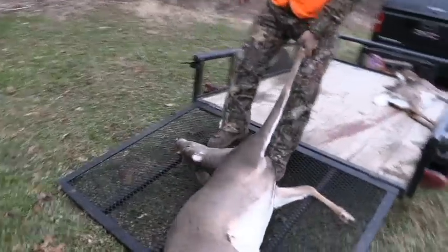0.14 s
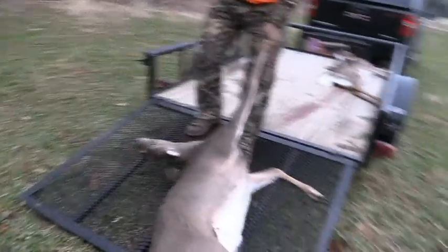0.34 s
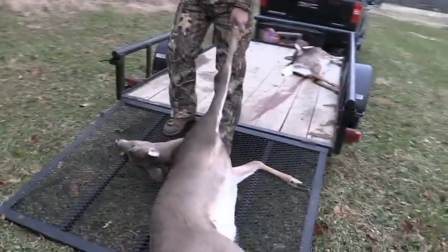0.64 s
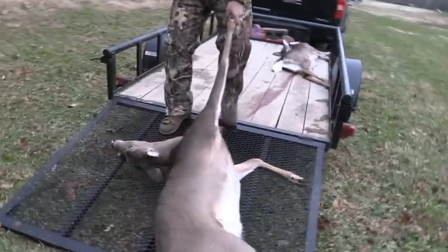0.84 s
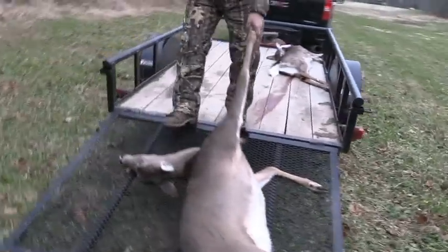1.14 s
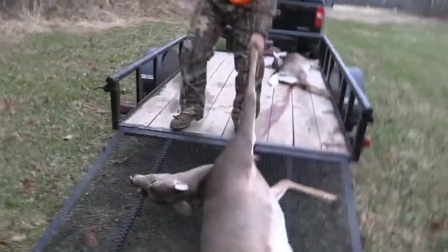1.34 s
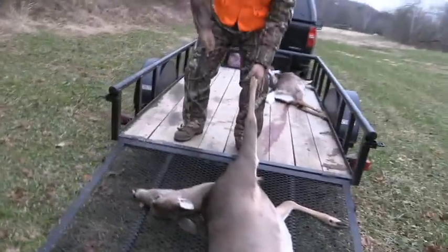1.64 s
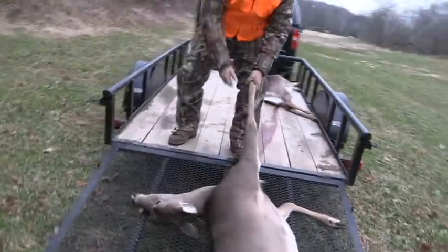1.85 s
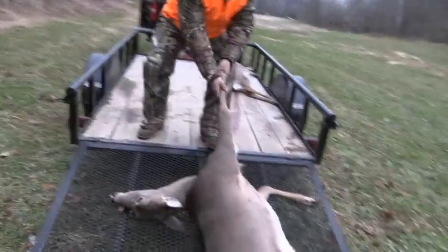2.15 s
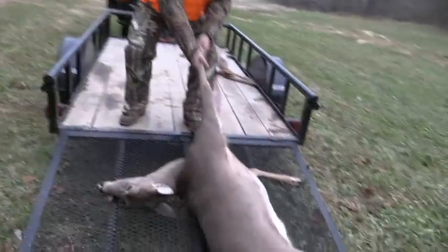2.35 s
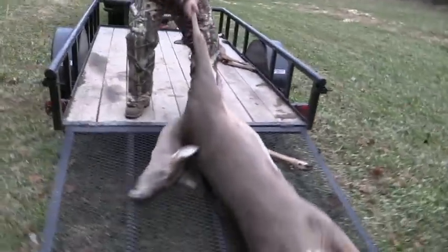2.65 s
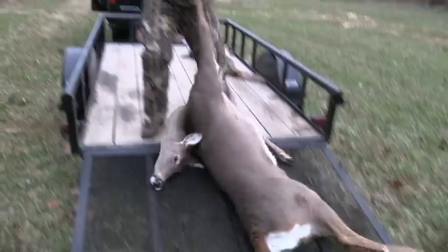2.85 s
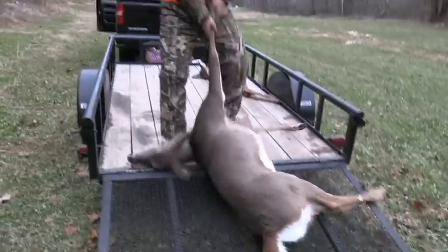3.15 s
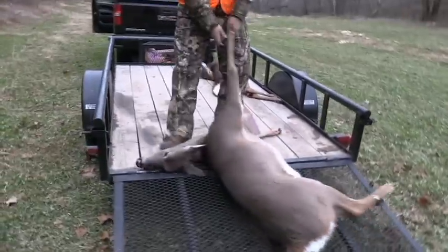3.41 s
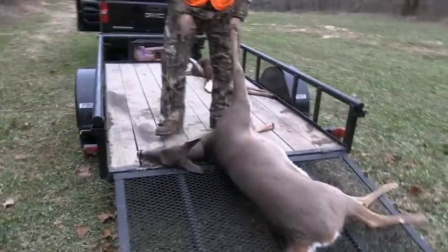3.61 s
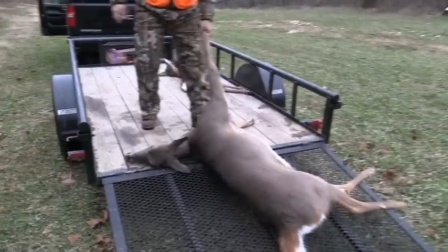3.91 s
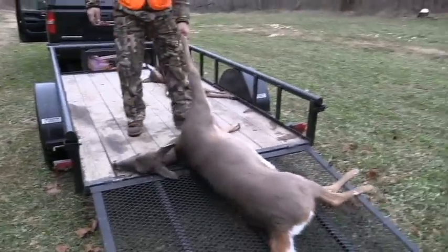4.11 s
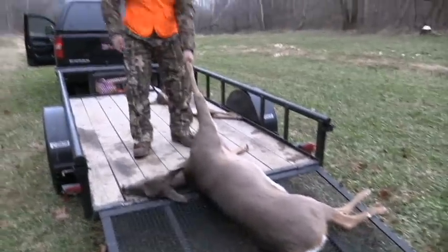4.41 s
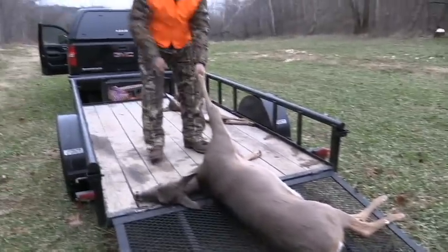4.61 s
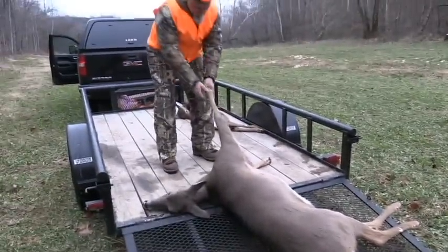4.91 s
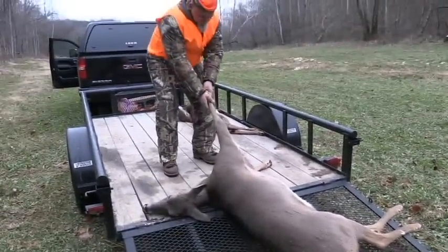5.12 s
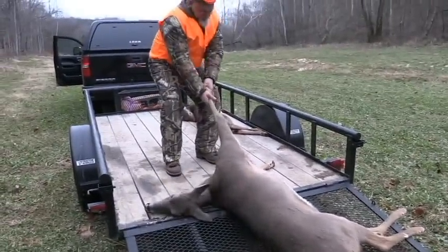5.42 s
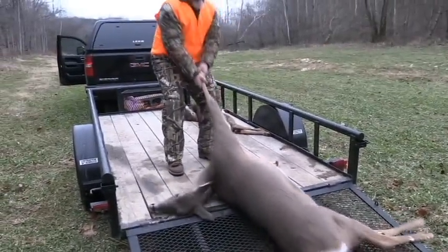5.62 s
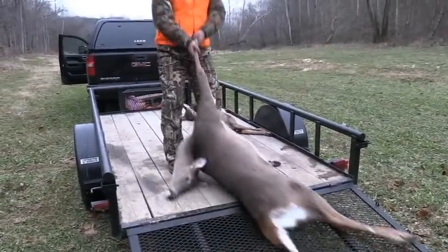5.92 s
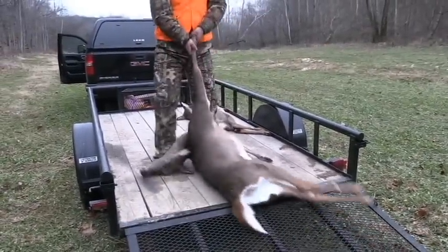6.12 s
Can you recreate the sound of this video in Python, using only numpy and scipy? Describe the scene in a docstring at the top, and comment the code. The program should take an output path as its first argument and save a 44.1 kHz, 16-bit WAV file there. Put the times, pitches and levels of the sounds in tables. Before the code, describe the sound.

Boots knock on trailer planks, clothes rustle, then a limp animal body drags over metal mesh with rumbling scrapes, thumps and a clattering finish.

```python
"""Carcass hauled onto a trailer

A heavy carcass is hauled in two main pulls up a steel mesh ramp onto a plank deck, in a quiet field.
Boots, head and legs knock on the trailer: shaped noise bursts for the planks, decaying sines for the frame.
Random slips, filtered, make the coat hiss, the mesh rattle and the deck rumble as the body gathers speed.
Clothes rustle as filtered grains; wires ping, a sole scuffs and rubber squeaks as resonated noise."""
import sys
import numpy as np
from scipy import signal
from scipy.fft import rfft, irfft
from scipy.io import wavfile
from scipy.ndimage import uniform_filter1d

SR = 44100
rng = np.random.default_rng(int(sys.argv[2]) if len(sys.argv) > 2 else 0)


def inscribe(sig):
    """Save sig as 16-bit PCM at rate SR to the path in sys.argv[1].

    A 1-D sig is mono; a 2-D sig holds one channel per row.
    Samples are clipped to [-1, 1] before scaling.
    """
    pcm = np.round(np.clip(np.atleast_2d(sig).T, -1, 1) * 32767)
    wavfile.write(sys.argv[1], SR, pcm.astype(np.int16))


N = 276066  # length in samples
TIME = np.arange(N) / SR  # seconds

# Spectrum of the open air. Each row: frequency in Hz, filter gain in dB.
AIR_SPECTRUM = [(25, 1), (60, 19), (200, 0), (500, -1.5), (900, -5), (4000, -12), (15000, -26)]
# Spectra of cloth and of the hairy coat. Each row: frequency in Hz, filter gain in dB.
CLOTH_SPECTRUM = [(100, -24), (600, -3.5), (6000, -6), (12000, -14.5), (16000, -24)]
COAT_SPECTRUM = [(100, -12), (600, -1), (4800, -4), (7000, -8), (10500, -10.5), (12000, -17.5),
                 (16000, -18)]
# Movements of the clothes. Each row: start in seconds, length in seconds, relative level in dB.
RUSTLES = [(0, 0.075, -46), (0.09, 0.086, -49), (0.46, .21, -47.5), (0.53, 0.035, -42.5),
           (2.058, 0.071, -51.5), (2.399, 0.04, -40), (3.249, 0.46, -47), (3.741, 0.027, -41.5),
           (3.851, 0.22, -47), (4.092, 0.03, -42), (4.373, 0.73, -59.5), (6.212, 0.052, -41)]
STROKE_EDGE_S = 0.017  # time constant with which a rub starts and dies
STEPPING_END_S, STEPPING_DB = 2.1, -54  # cloth brushes steadily while the legs step back up the ramp
RESTING_DB = -69.5  # the cloth is never quite still

# A boot scuffs the trailer. Each row: start in seconds, length in seconds, level in dB.
SCUFFS = [(0, 0.082, -37.5), (3.755, 0.017, -41.5), (5.08, 0.012, -52)]
# Resonances of a rubbing sole. Each row: frequency in Hz, width of one pass in Hz, gain of one pass in dB.
SOLE_RESONANCES = [(1140, 1700, 6.5), (2300, 450, 5), (2970, 140, 9), (3350, 75, 5), (4400, 150, 6)]

# Surges of the carcass over the mesh. Each row: start, rise, hold and release in seconds,
# then relative peak levels of coat, mesh rattle, deck rumble and ramp sag in dB.
SURGES = [(0.208, 0.052, 0.1, 0.33, -52, -50.5, -39.5, -67),
          (2.261, 0.55, 0.077, 0.44, -31.5, -23, -23.5, -26), (5.436, 0.27, .2, .15, -35, -44, -54, -66),
          (5.837, 0.056, 0.11, 0.29, -51, -16, -23.5, -50),
          (5.99, 0.029, 0.11, 0.46, -50, -28.5, -28.5, -42)]
# Each layer grows as a power of the body's speed: hair hisses at the least motion, steel needs the full pull.
COAT_POWER, RATTLE_POWER, RUMBLE_POWER, SAG_POWER = 1.44, 6.6, 4.3, 8.2
# Spectra of the rattling mesh, the rumbling deck and the ramp flexing under the load.
# Each row: frequency in Hz, filter gain in dB.
RATTLE_SPECTRUM = [(40, -51), (200, -4), (500, 15), (1050, 8.5), (1650, 5), (2200, -4), (3000, -17.5),
                   (4200, -4), (7000, -29), (11000, -26), (16000, -73)]
RUMBLE_SPECTRUM = [(40, -36), (160, -5), (230, 0.5), (300, -1.5), (380, -0.5), (520, 4), (700, -16),
                   (1300, -19), (4000, -44)]
SAG_SPECTRUM = [(30, -71), (60, 6.5), (115, 20), (220, 11), (400, -34.5)]
# Narrow resonances of the steel mesh. Each row: frequency in Hz, gain in dB.
MESH_RESONANCES = [(1032, 19.5), (1075, 13.5), (1154, 10), (1261, 19), (1334, 19), (1416, 20), (1567, 19),
                   (1700, 18), (3289, 1), (4781, 5), (6935, 2)]
MESH_WIDTH_HZ = 9.2
# The sprung trailer stirs on after each blow (relative dB, dB per s) and under every movement (relative dB).
STIR_DB, STIR_FADE_DB_PER_S, FOOTING_DB = -27, 49.5, -3.5

# Blows on ramp and deck. Each row: start in seconds, relative levels of body, thump, clack and crack in dB,
# t60 of the fast ring in seconds, centre of the body in Hz.
KNOCKS = [(0.255, -40, -26.5, -37.5, -52, 1, 397), (0.897, -15.5, -19.5, -20.5, -34, 0.57, 535),
          (0.997, -15.5, -17, -38, -53, 0.27, 415), (1.091, -30.5, -19, -55, -66, 0.97, 312),
          (1.377, -11, -19.5, -21, -35, 0.15, 718), (1.387, -9, -22.5, -25.5, -38, 0.25, 650),
          (2.999, -9, -17.5, -29, -45, 0.15, 413), (3.140, -8, -21, -21.5, -41, 0.38, 443),
          (3.249, -11, -14, -22, -16, 0.23, 376), (3.264, -7, -15.5, -27, -53, 0.033, 422),
          (3.285, -10.5, -33, -41, -56, 0.085, 420), (3.720, -15, -25, -38, -43, 0.2, 474),
          (3.888, -29, -25, -55, -67, 0.06, 302), (4.247, -13.5, -15, -24, -43.5, 0.28, 580),
          (4.255, -10, -21, -29, -41, 0.12, 560), (6.204, -10, -21, -24, -40, 0.23, 544)]
# Lasting modes of the trailer frame. Each row: frequency in Hz, relative level in dB, t60 in seconds.
FRAME_MODES = [(160.6, -7.5, 0.86), (226.4, 1.5, 0.37), (270.2, -3, 0.42), (349.4, -2.5, 0.31),
               (386.5, 0, 0.31), (456, -4, 0.42), (525.3, 2, 0.23), (593, 3.5, 0.18), (653, -2, 0.3),
               (824, 5, 0.32), (1537, 7.5, 0.24), (1790, -10, 0.55)]
OFF_CENTRE_DB_PER_OCTAVE = 6  # each spot of the trailer favours the modes near its own pitch
CLACK_MODES_HZ = 800  # modes above this answer to the hard clack, those below to the body of the blow
# Damping of the slow ring of the planks. Each row: frequency in Hz, t60 in seconds.
PLANK_T60 = [(80, 1), (450, 0.84), (900, 0.41), (2000, 0.26), (15000, .06)]
# A harder clack reaches higher, from a dull limit upward.
DULL_TOP_HZ, DULL_CLACK_DB, TOP_HZ_PER_DB = 1153, -26.5, 154

# Soft thuds of shifting weight. Each row: start in seconds, settled pitch in Hz, level in dB, t60 in seconds.
THUDS = [(0.323, 229, -28, 0.19), (0.485, 56.6, -25.5, 0.16), (0.562, 110, -23.5, 0.13),
         (0.626, 61, -24, 0.25), (1.259, 58, -27, 0.7), (2.264, 417, -23, 0.022), (2.708, 171, -16, 0.066),
         (3.261, 143, -18.5, 0.3), (4.323, 117, -15, 0.076), (4.769, 218, -13, 0.0084),
         (5.1, 250, -25.5, 0.063)]
# Hard clicks and catches of hoof and steel.
# Each row: start in seconds, relative middle level in dB, relative treble level in dB, nominal t60 in seconds.
CLICKS = [(1.107, -60, -53, 0.011), (1.243, -47.5, -34.5, 0.28), (2.017, -66, -56, 0.0074),
          (3.058, -37, -59, .03), (3.22, -44, -48, 0.0094), (5.389, -72, -42.5, 0.037),
          (5.863, -17, -21, 0.28), (5.898, -19.5, -17.5, 0.42), (5.963, -18, -21, 0.51),
          (6.106, -25, -23, 0.091), (6.124, -27, -32.5, 0.27)]
# The hide plucks single wires of the mesh.
# Each row: start in seconds, relative level in dB, t60 of the slip in seconds.
PLUCKS = [(2.736, -26.5, .02), (2.784, -22.5, 0.035), (2.801, -22, 0.02), (2.866, -18, 0.084),
          (2.892, -23.5, 0.045)]
# Resonances of a plucked wire. Each row: frequency in Hz, width in Hz, gain in dB.
WIRE_RESONANCES = [(1700, 1200, 1.5), (4060, 110, 8), (4300, 64, 4.5), (6570, 180, 1)]
# Rubber and stiff cloth squeak or zip as they slip.
# Each row: start in seconds, length in seconds, pitch in Hz, width of one pass in Hz, level in dB.
SQUEAKS = [(3.736, 0.056, 3500, 1500, -39), (3.941, 0.076, 5500, 2010, -41), (5.068, .055, 2320, 110, -54),
           (5.085, .036, 6790, 200, -51.5)]


def amp(db):
    """Decibels to amplitude ratio."""
    return 10 ** (np.asarray(db) / 20)


def unit(x):
    """Normalisation to an rms of 1."""
    return x / np.sqrt(np.mean(x ** 2) + 1e-20)


def read(points, hz):
    """Interpolation of a table along log frequency."""
    f, value = np.transpose(points)
    return np.interp(np.log(hz + 1), np.log(f + 1), value)


def add(mix, s, sound):
    """Superposition: adds a sound to the mix from s seconds on."""
    part = mix[max(round(s * SR), 0):][:len(sound)]
    part += sound[:len(part)]


def colour(x, points, size=4096):
    """Minimum-phase filtering: the Hilbert transform of the log gain supplies the phase."""
    log_gain = np.log(amp(read(points, abs(np.fft.fftfreq(size, 1 / SR)))))
    response = np.exp(np.conj(signal.hilbert(log_gain)))
    taps = np.fft.ifft(response).real[:size // 2]
    return signal.oaconvolve(x, taps)[:len(x)]


def resonate(x, peaks):
    """Parallel resonators, each at least 5 Hz wide, driven by one excitation."""
    out = np.zeros(len(x))
    for hz, width, db in peaks:
        b, a = signal.iirpeak(hz, hz / max(width, 5), SR)
        out += amp(db) * signal.lfilter(b, a, x)
    return out


def grains(per_s, spread_db):
    """Friction as random tiny slips, a few much larger than the rest."""
    size = amp(spread_db * np.minimum(rng.exponential(1, N), 4))
    sign = rng.choice([-1, 1], N)
    return unit(size * sign * (rng.random(N) < per_s / SR))


def burst(envelope):
    """Transient excitation: noise of unit energy under an envelope."""
    x = rng.standard_normal(len(envelope)) * envelope
    return x / np.linalg.norm(x)


def damp(x, t60_points):
    """Frequency-dependent damping: each band of a vibration dies at its own speed."""
    f, s, z = signal.stft(x, SR, nperseg=128)
    decay = amp(-60 * s / read(t60_points, f)[:, None])
    return signal.istft(z * decay, SR)[1][:len(x)]


def strokes(rows):
    """Gain of steady rubs with exponential edges; overlapping rubs add in energy."""
    energy = np.zeros(N)
    for start, length, db in rows:
        outside = np.maximum(start - TIME, 0) + np.maximum(TIME - start - length, 0)
        energy += (amp(db) * np.exp(-outside / STROKE_EDGE_S)) ** 2
    return np.sqrt(energy)


def open_air(db=-49.5):
    """Steady ambient noise: a random signal with most of its weight in the bass."""
    return amp(db) * unit(colour(rng.standard_normal(N), AIR_SPECTRUM))


def clothes():
    """Gain of the cloth by energy addition: a faint rest level, steady stepping and single movements."""
    stepping = (0.0061, STEPPING_END_S, STEPPING_DB)
    return np.hypot(amp(RESTING_DB), strokes([stepping] + RUSTLES))


def slide(coat, db=1.5, flutter_db=0.9):
    """Brushing friction: countless hairs and folds of cloth slip past, in small uneven tugs."""
    tugs = unit(colour(rng.standard_normal(N), [(20, 0), (80, -2), (250, -25), (1000, -70)]))
    hairs = unit(colour(grains(per_s=9000, spread_db=2.0), COAT_SPECTRUM))
    cloth = unit(colour(grains(per_s=10000, spread_db=3.5), CLOTH_SPECTRUM))
    return amp(db + flutter_db * tugs) * (coat * hairs + clothes() * cloth)


def crinkle(db=-8):
    """Buckling: folds of stiff cloth give way in separate small ticks."""
    folds = grains(per_s=50, spread_db=3.5)
    t = np.arange(SR // 200) / SR
    tick = burst(amp(-60 * t / .005))
    ticks = signal.oaconvolve(folds, tick)[:N]
    return amp(db) * clothes() * unit(colour(ticks, CLOTH_SPECTRUM))


def scuff():
    """Frictional excitation: a rubbing sole makes the steel sing briefly in a few sharp resonances."""
    rub = grains(per_s=5000, spread_db=1.5)
    # two passes sharpen the resonances
    singing = resonate(resonate(rub, SOLE_RESONANCES), SOLE_RESONANCES)
    return strokes(SCUFFS) * unit(singing)


def stir():
    """Gain of the sprung trailer's own motion: energy fed in by blows, cloth movement and scuffing feet."""
    energy = FOOTING_GAIN = amp(FOOTING_DB) ** 2 * (clothes() ** 2 + strokes(SCUFFS) ** 2)
    for s, body_db, *_ in KNOCKS:
        fading = amp(body_db + STIR_DB - STIR_FADE_DB_PER_S * abs(TIME - s))
        energy = energy + (TIME > s) * fading ** 2
    return np.sqrt(energy)


def surges():
    """Power laws of speed for coat, rattle, rumble and sag: the body gathers speed, slides and slows."""
    energy = np.zeros((4, N))
    powers = COAT_POWER, RATTLE_POWER, RUMBLE_POWER, SAG_POWER
    for start, rise, hold, release, *peaks in SURGES:
        corners = start + np.cumsum([0, rise, hold, release])
        speed = np.interp(TIME, corners, [0, 1, 1, 0])
        energy += [(amp(db) * speed ** power) ** 2 for db, power in zip(peaks, powers)]
    return np.sqrt(energy)


def drag(rattle, rumble, sag, wire_db=-5, frame_db=-5, grit_db=-13, spurt=1.1, judder_db=1.45):
    """Stick-slip motion on the mesh: wires rattle, the deck rumbles and the ramp sags beneath."""
    rumble = np.hypot(rumble, stir())
    slips = grains(per_s=2200, spread_db=2.5)

    # now and then the hide snags on a wire and lets go in a short spurt of slips
    spurt_decay = np.exp(-1 / (.003 * SR))
    snags = signal.lfilter([1], [1, -spurt_decay], rng.random(N) < 70 / SR)
    spurts = slips * (1 + spurt * snags)

    mesh_peaks = [(hz, MESH_WIDTH_HZ, db) for hz, db in MESH_RESONANCES]
    ringing_wires = unit(resonate(spurts, mesh_peaks))
    wires = unit(unit(colour(spurts, RATTLE_SPECTRUM)) + amp(wire_db) * ringing_wires)

    frame_peaks = [(hz, 3 / t60, db) for hz, db, t60 in FRAME_MODES if hz < CLACK_MODES_HZ]
    frame = unit(resonate(slips, frame_peaks))
    deck = unit(unit(colour(slips, RUMBLE_SPECTRUM)) + amp(frame_db) * frame)

    grit = amp(grit_db) * unit(colour(slips * snags, COAT_SPECTRUM))  # strongest where the ramp sags most
    ramp = unit(colour(slips, SAG_SPECTRUM)) + grit

    # the hide sticks and jerks on from one strand of the mesh to the next
    jerks = unit(colour(rng.standard_normal(N), [(10, -12), (35, 0), (70, -12), (300, -70)]))
    judder = unit(amp(judder_db * jerks))
    return sag * ramp + rumble * deck + rattle * judder * wires


def plate(envelope, count=3):
    """High modal density: many close modes under one envelope, their energy spread evenly over frequency."""
    x = burst(envelope)
    for _ in range(count):
        x = irfft(np.exp(1j * np.angle(rfft(x))), len(x))  # flat spectrum, phases kept
        local_rms = np.sqrt(abs(uniform_filter1d(x ** 2, size=129)) + 1e-14)
        x *= envelope / local_rms
    return x / np.linalg.norm(x)


def frame_ring(t, body_db, clack_db, hz):
    """Modal superposition: decaying sines of the frame, strongest near the pitch of the spot struck."""
    ring = np.zeros(len(t))
    for pitch, db, t60 in FRAME_MODES:
        drive_db = clack_db if pitch > CLACK_MODES_HZ else body_db
        off_centre_db = OFF_CENTRE_DB_PER_OCTAVE * abs(np.log2(pitch / hz))
        decay = amp(db + drive_db - off_centre_db - 60 * t / t60)
        ring += decay * np.sin(2 * np.pi * (pitch * t + rng.random()))
    return ring * (1 - np.exp(-t / 0.0014))  # the frame takes a moment to start swinging


def knock(body_db, thump_db, clack_db, crack_db, t60, hz, top_hz,
          tail_db=-6, modes_db=-11, dwell=0.0112, strike=0.23):
    """Impact on a damped plate: the blow spreads through the planks, dulls, and leaves the frame ringing."""
    t = np.arange(SR) / SR
    # the duller the blow, the longer the contact takes to build
    contact = 1 - np.exp(-t / (.00012 * amp(body_db - clack_db)))

    planks = amp(-60 * np.maximum(t - dwell, 0) / max(t60, .02)) + amp(-60 * t / 0.015)
    blow = damp(plate(contact * planks), [(500, 0.65), (1500, 0.18), (4000, 0.28)])
    blow[0] += strike  # the sharp first contact
    tail = damp(plate(contact * amp(-60 * t / 1.36)), PLANK_T60)

    low = [(30, thump_db - 50), (120, thump_db + 6.0), (230, thump_db),
           (0.642 * hz, body_db), (1.25 * hz, body_db - 3.0)]
    high = [(min(1.9 * hz, .9 * top_hz), clack_db), (top_hz, clack_db - 3),
            (1.5 * top_hz, clack_db - 19), (16000, clack_db - 60)]
    boards = colour(blow + amp(tail_db) * tail, low + high)

    snap = burst(contact * (amp(-60 * t / .028) + amp(-15 - 60 * t / .1)))
    crack = colour(snap, [(500, 0.0), (3500, -1.0), (9000, -13.0), (12000, -15.5), (16000, -20.0)])
    ring = frame_ring(t, body_db, clack_db, hz)
    return amp(45.0) * boards + amp(crack_db + 37) * crack + amp(modes_db) * ring


def knocks():
    """Contact hardness sets bandwidth: boots, head and legs land, harder clacks reaching higher."""
    out = np.zeros(N)
    for s, body_db, thump_db, clack_db, crack_db, t60, hz in KNOCKS:
        top_hz = DULL_TOP_HZ + TOP_HZ_PER_DB * max(clack_db - DULL_CLACK_DB, 0)
        add(out, s, knock(body_db, thump_db, clack_db, crack_db, t60, hz, top_hz))
    return out


def thuds(rise=0.0026, bend_hz=18, settle=0.026):
    """Damped oscillation: a soft load bends the deck, whose swing sinks in pitch as the weight settles."""
    out, t = np.zeros(N), np.arange(SR // 2) / SR
    for s, hz, db, t60 in THUDS:
        turns = np.cumsum(hz + bend_hz * np.exp(-t / settle)) / SR
        swell = 1 - np.exp(-t / rise)
        add(out, s, amp(db - 60 * t / t60) * swell * np.sin(2 * np.pi * turns))
    return out


def clicks(after_db=-18):
    """Hard impact with two decays: a bright snap with a duller shiver of the mesh behind it."""
    out, t = np.zeros(N), np.arange(SR // 2) / SR
    for s, middle_db, treble_db, t60 in CLICKS:
        life = max(t60, .008)
        snap = burst(amp(-60 * t / life) + amp(after_db - 60 * t / (2 * life)))
        shape = [(100, middle_db - 14.0), (1600, middle_db + 3.5), (3000, middle_db - 0.5),
                 (6500, treble_db), (10500, treble_db - 10.5), (13000, treble_db - 21)]
        damped = damp(snap, [(3000, 0.83), (12000, 0.15)])
        add(out, s, amp(37) * colour(damped, shape))
    return out


def plucks():
    """Release of a plucked wire: the hide hooks it, lets go, and a slip of noise makes it ping."""
    out, t = np.zeros(N), np.arange(SR // 4) / SR
    for s, db, t60 in PLUCKS:
        slip = burst(amp(-60 * t / max(t60, .005)))
        add(out, s, amp(db + 30.5) * resonate(slip, WIRE_RESONANCES))
    return out


def squeaks():
    """Slip noise locked to a resonance: it gathers round one pitch, swelling and dying with the movement."""
    out = np.zeros(N)
    for s, length, hz, width, db in SQUEAKS:
        swell = np.hanning(round(length * SR))
        peak = [(hz, width, 0)]
        tone = resonate(resonate(rng.standard_normal(len(swell)), peak), peak)
        add(out, s, amp(db) * swell * unit(tone))
    return out


def scene():
    """Linear superposition of all sources in open air, the same in both channels."""
    coat, rattle, rumble, sag = surges()
    mono = open_air() + slide(coat) + crinkle() + scuff()
    mono += drag(rattle, rumble, sag) + knocks() + thuds()
    mono += clicks() + plucks() + squeaks()
    return np.array([mono, mono])


def record(dry, edge_hz=15950):
    """Soft saturation rounds off the loudest peaks; a linear-phase low-pass then limits the band."""
    rounded = dry / (1 + dry ** 6) ** (1 / 6)
    lowpass = signal.firwin(511, edge_hz, window=("kaiser", 9), fs=SR)
    return signal.oaconvolve(rounded, lowpass[None], "same")


dry = scene()
out = record(dry)
inscribe(out)
```